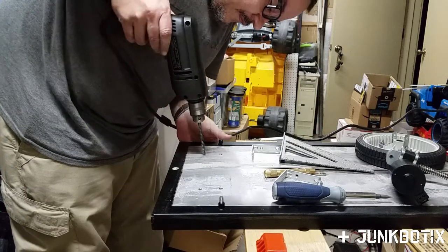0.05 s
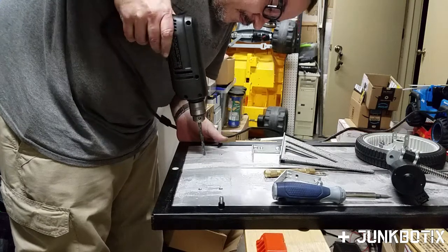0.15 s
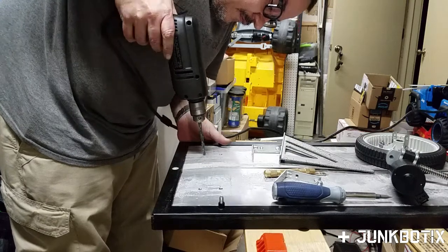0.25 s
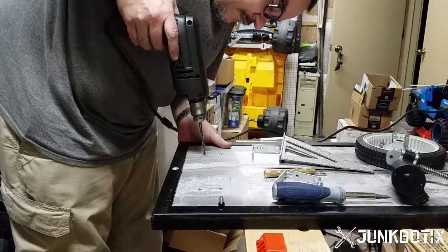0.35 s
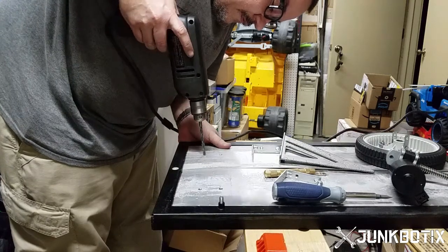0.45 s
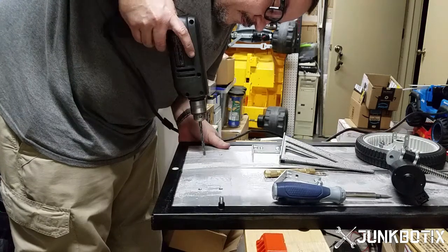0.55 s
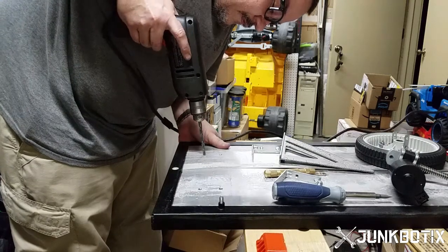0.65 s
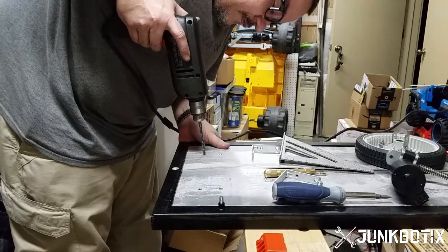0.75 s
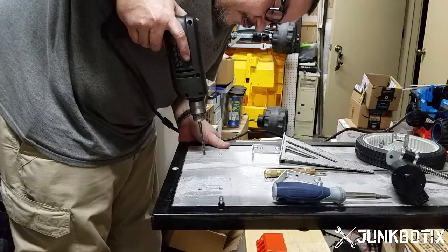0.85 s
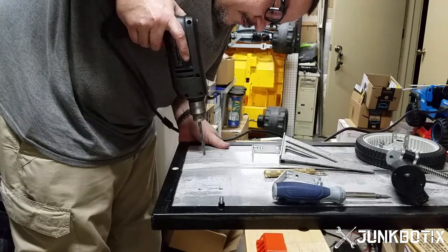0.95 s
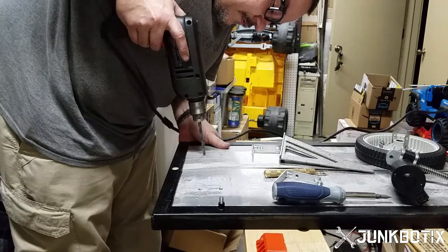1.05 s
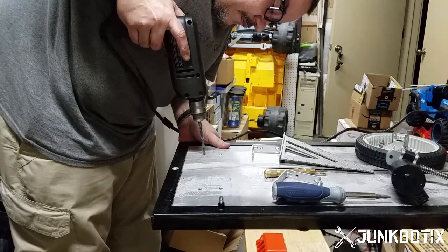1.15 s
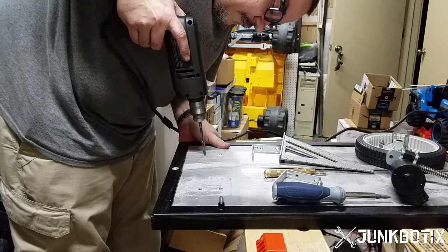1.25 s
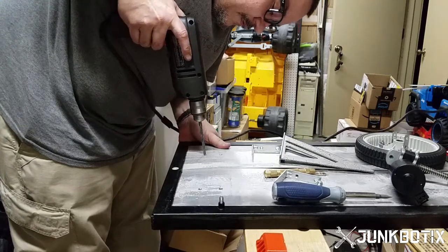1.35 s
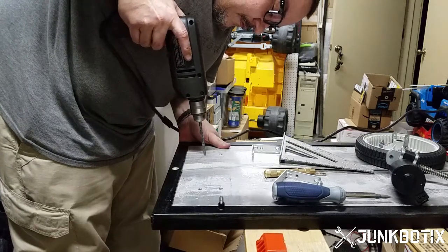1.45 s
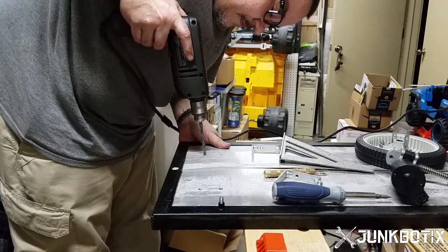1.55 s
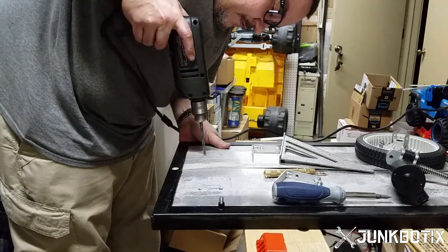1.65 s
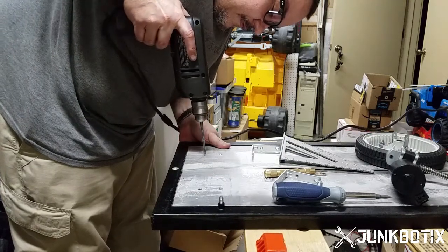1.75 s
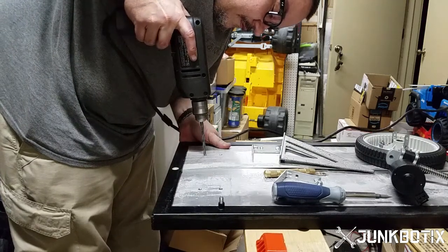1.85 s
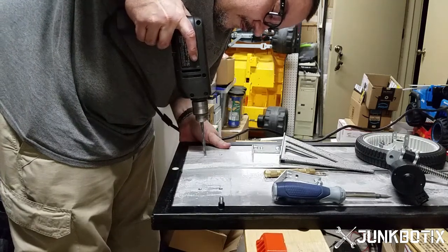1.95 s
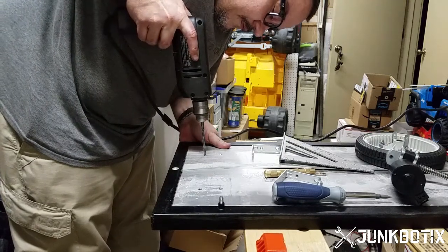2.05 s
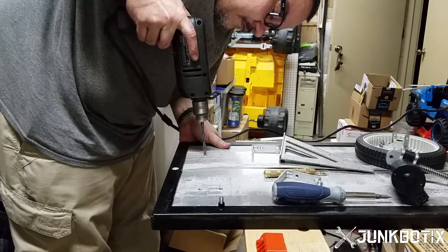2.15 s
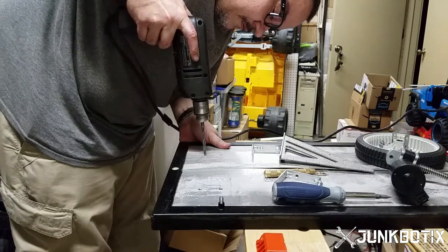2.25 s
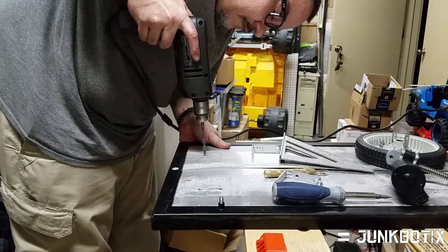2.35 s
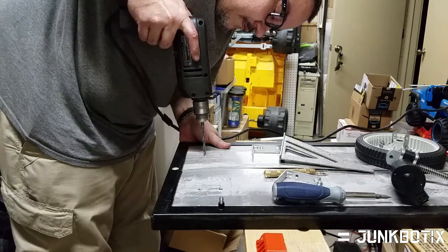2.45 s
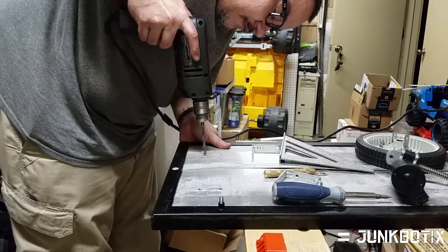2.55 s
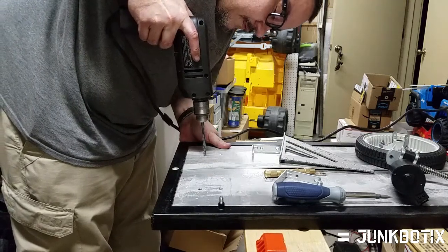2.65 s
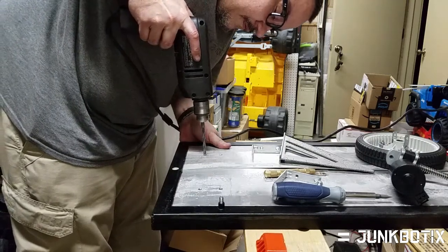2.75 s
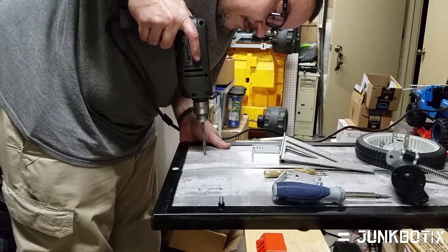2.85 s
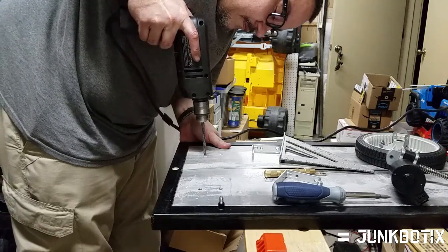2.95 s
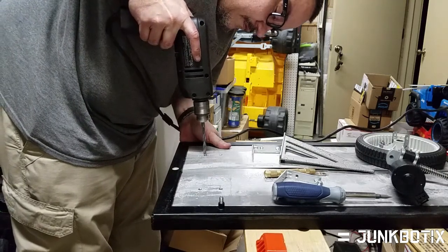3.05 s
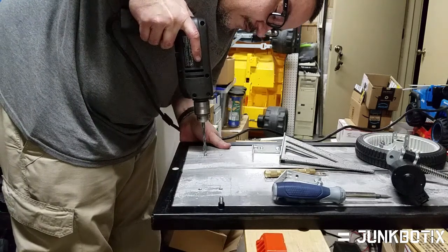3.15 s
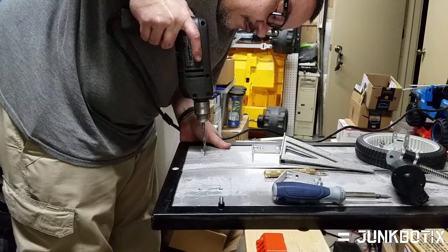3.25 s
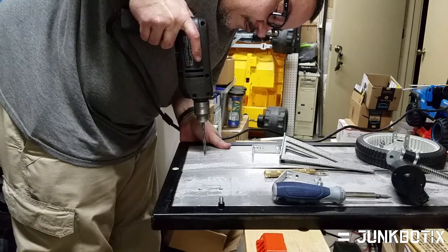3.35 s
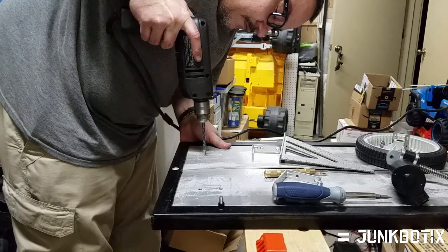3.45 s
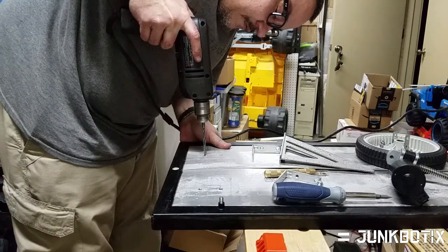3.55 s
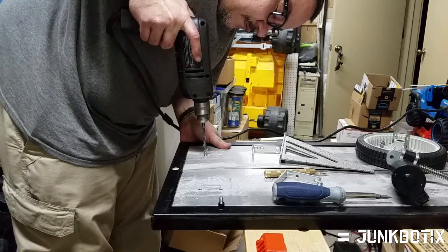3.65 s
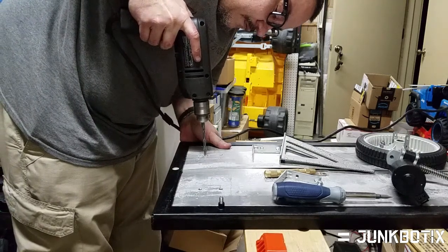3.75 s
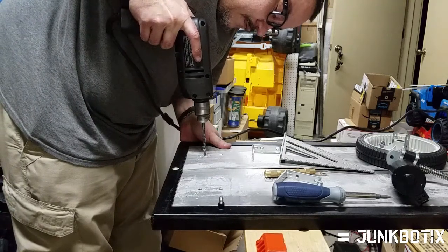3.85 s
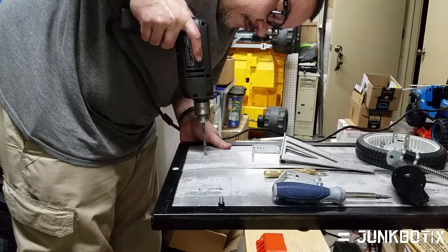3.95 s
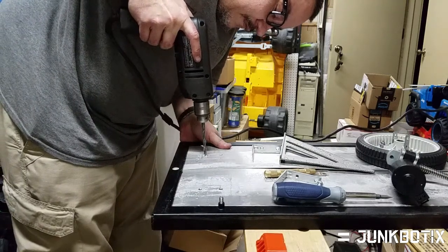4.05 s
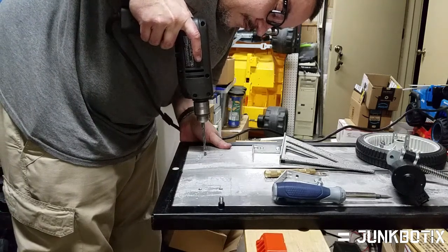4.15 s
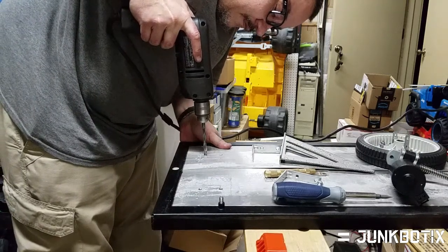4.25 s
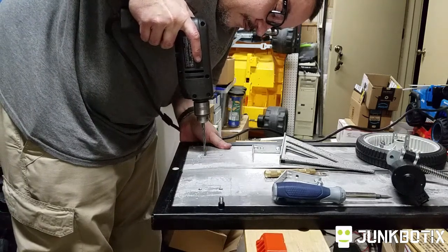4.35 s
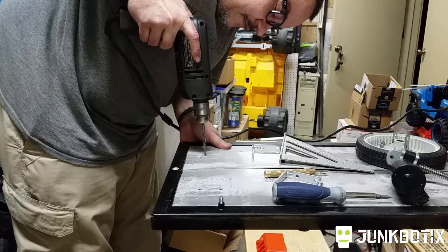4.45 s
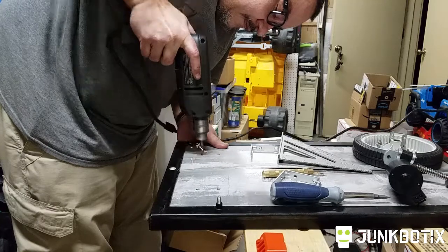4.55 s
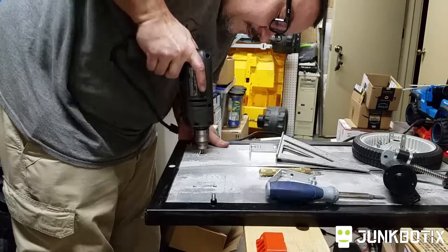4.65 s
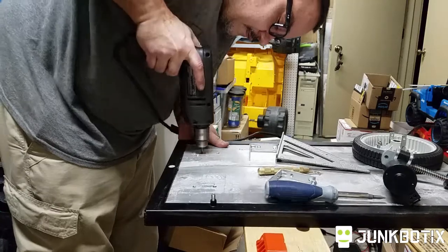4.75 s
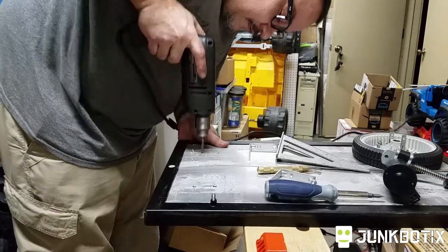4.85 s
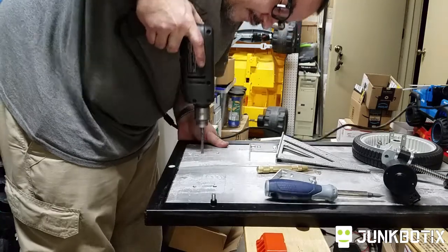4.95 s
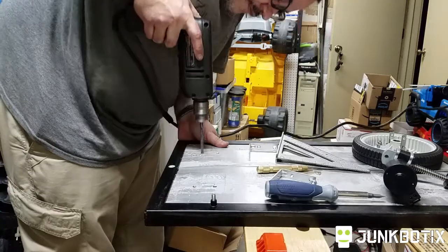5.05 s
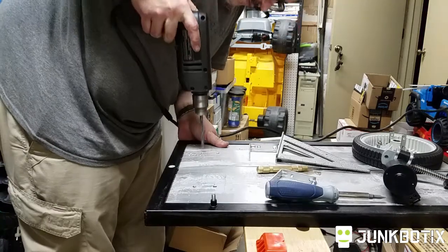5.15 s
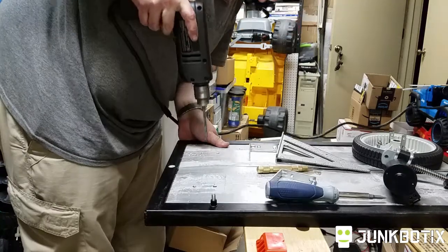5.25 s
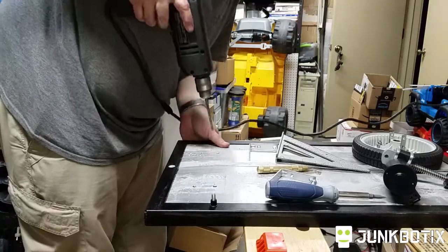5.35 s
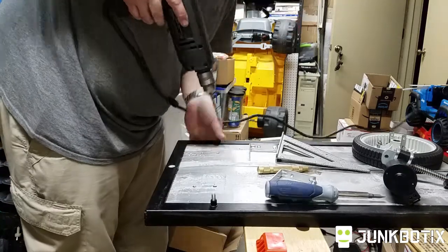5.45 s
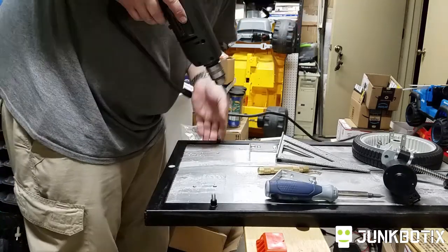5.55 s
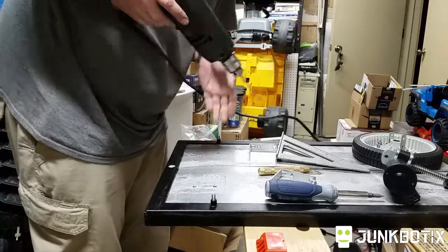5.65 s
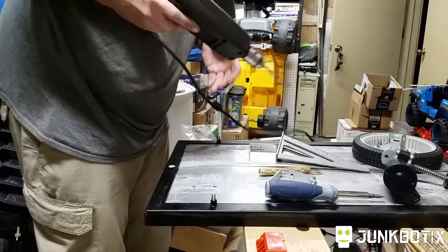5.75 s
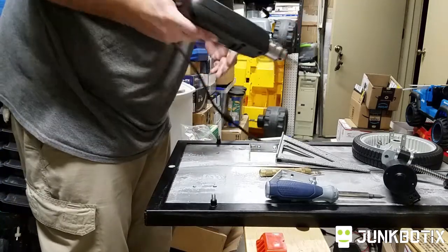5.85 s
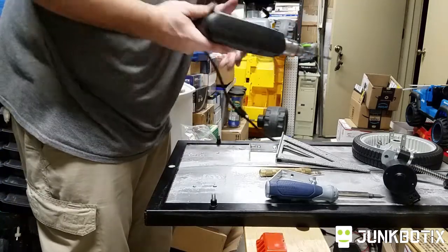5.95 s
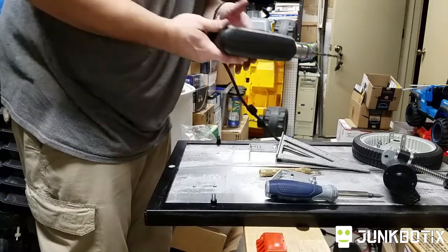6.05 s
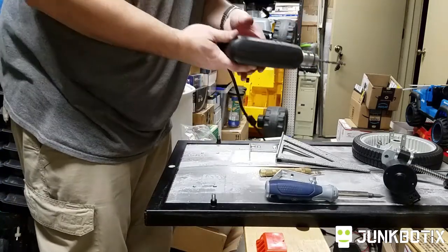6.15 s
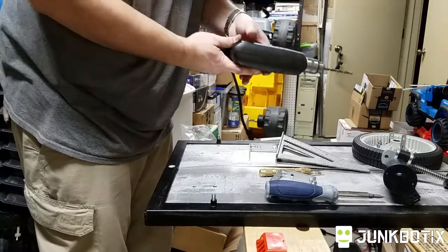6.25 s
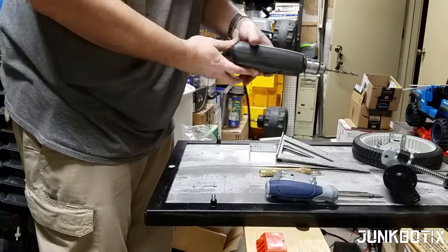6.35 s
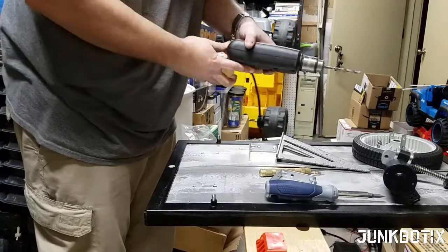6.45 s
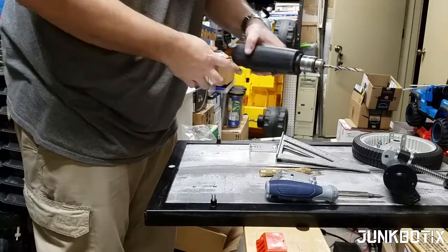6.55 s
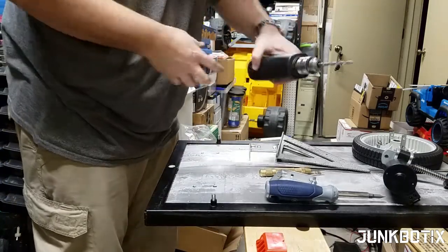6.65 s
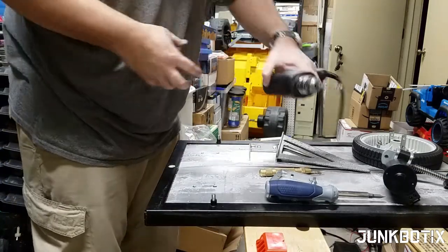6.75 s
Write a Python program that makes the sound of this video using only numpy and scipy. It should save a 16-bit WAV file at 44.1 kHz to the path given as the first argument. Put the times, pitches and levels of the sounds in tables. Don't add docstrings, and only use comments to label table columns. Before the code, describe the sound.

In a small cluttered workshop, a hand slides and taps lightly on an aluminum sheet. A corded drill spins up quickly into a high gear whine with airy motor roar. As the bit bites, pitch sinks and the tone grows rough and buzzy. It breaks through, speeds up and bangs the loose sheet, then coasts down with a falling whirr. One close microphone, short room reflections.

```python
import sys
import numpy as np
from scipy import signal
from scipy.fft import rfft, irfft
from scipy.io import wavfile
from scipy.ndimage import uniform_filter1d

SR = 44100
rng = np.random.default_rng(int(sys.argv[2]) if len(sys.argv) > 2 else 0)


def materialize(psi):
    bounded = np.clip(np.atleast_2d(psi).T, -1, 1)
    quanta = np.round(bounded * 32767).astype(np.int16)
    wavfile.write(sys.argv[1], SR, quanta)


def voltage_ratio(level):
    return 10 ** (np.asarray(level, float) / 20)


N = 299439
T = np.arange(N) / SR
TEETH = 7
CRUISE_HZ = 2000
RELEASE_S = 5.06
TOP_HZ = 15650
# from seconds, to seconds.
LOOSE_SPAN_S = (4.5, 5.15)


def unit(x):
    return x / np.sqrt(np.mean(x ** 2))


def curves(table):
    s, *columns = np.transpose(table)
    return [np.interp(T, s, c) for c in columns]


def swells(table):
    return sum(np.interp(T, [s - rise, s, s + fall], [0, db, 0]) for s, db, rise, fall in table)


def between_s(start, stop, soft=.01):
    return uniform_filter1d(1. * (T > start) * (T < stop), int(soft * SR))


def walk(rate):
    k = int(SR / rate)
    steps = np.repeat(rng.standard_normal(N // k + 1), k)
    return unit(uniform_filter1d(uniform_filter1d(steps, k), k)[:N])


def band(x, lo_hz, hi_hz):
    return signal.sosfilt(signal.butter(2, [lo_hz, hi_hz], "band", fs=SR, output="sos"), x)


def resonances(hz, rings):
    return sum(db / (1 + (2 * (hz - f) / width) ** 2) for f, width, db in rings)


def colour(x, spectrum, rings=()):
    hz = np.maximum(np.arange(N // 2 + 1) * SR / N, 1.)
    point_hz, point_db = np.transpose(spectrum)
    db = np.interp(np.log(hz), np.log(point_hz), point_db) + resonances(hz, rings)
    return unit(irfft(rfft(x) * voltage_ratio(db), N))


# start in seconds, mesh rate gained in Hz, rise in seconds.
RUN_UPS = [
    (.97, 2000, .37),
    (4.17, 850, .185),
    (4.52, 655, .2),
]
# time in seconds, mesh rate lost in Hz.
DRAG = [(1.85, 0), (2.01, 19), (2.3, 106), (2.7, 245), (3.09, 419), (3.26, 505), (3.42, 652), (3.55, 757),
        (3.85, 870), (4.1, 948), (4.17, 983), (4.65, 995), (4.72, 1120), (4.92, 983)]


def motor():
    runs = [hz * np.tanh(np.clip(T - s, 0, None) / rise) for s, hz, rise in RUN_UPS]
    drag_hz, = curves(DRAG)
    coast = np.exp(-np.clip(T - RELEASE_S, 0, None) / 1.19)
    mesh_hz = (sum(runs) - drag_hz) * coast
    spin_oct = np.log2(runs[0] / CRUISE_HZ + 1e-4)
    bite = np.tanh(drag_hz / 510)
    return mesh_hz, spin_oct, np.log2(coast), bite


# from seconds, to seconds, level in dB.
CONTACTS = [
    (.97, 4.52, 1.5),
    (4.65, 4.715, 3),
]
# peak in seconds, level in dB, rise in seconds, fall in seconds.
PUSHES = [
    (1.95, 1, .3, 0.28),
    (3.1, 2.5, 0.37, 0.37),
    (3.98, -0.5, .15, 0.14),
    (4.27, -0.5, 0.11, .14),
]


def tooth_load(spin_oct):
    loaded = sum(voltage_ratio(db) * between_s(start, stop) for start, stop, db in CONTACTS)
    return loaded * voltage_ratio(12 * spin_oct + swells(PUSHES))


# multiple of the mesh rate, level in dB idling, dB gained by biting.
LOWER = [(1, -39, -1.5), (2, -40, 10), (3, -36, 7.5)]
# multiple of the mesh rate, level in dB.
UPPER = [(4, 2.5), (5, 0), (6, -2), (7, -5.5), (8, -9), (9, -13), (10, -14), (11, -17), (12, -17),
         (13, -18), (14, -16)]
# centre in Hz, width in Hz, lift in dB.
GEAR_RINGS = [(1070, 85, 10.5), (1380, 64, 7.5), (1580, 46, 2), (1874, 260, 9.5), (2110, 200, -7),
              (2450, 340, 3), (3056, 350, 8.5), (3620, 150, 5.5), (3873, 67, 7), (4960, 480, 6),
              (5940, 180, 5)]
# frequency in Hz, level in dB.
GEAR_CASE = [(4000, -3), (5000, -2), (6000, -5), (6700, 3), (8000, -7.5), (9500, 0.5), (11000, -3),
             (12500, 9.5), (13700, 6), (14800, 14)]


def whine(mesh, mesh_hz, spin_oct, bite, unsteady, patchy):
    upper_db = -42 + 14 * bite - 7 * (T > LOOSE_SPAN_S[0]) + 40 * spin_oct
    upper_db = upper_db - 30 * np.clip(.25 - unsteady, 0, 1)
    scale = np.arange(8000.)
    rings_db = resonances(scale, GEAR_RINGS)
    case_hz, case_db = np.transpose(GEAR_CASE)
    partials = []
    for k, idle_db, bite_db in LOWER:
        ring_db = np.interp(k * mesh_hz, scale, rings_db)
        partials.append((k, idle_db + bite_db * bite + 11 * k * spin_oct + ring_db))
    for k, db in UPPER:
        partials.append((k, upper_db + db + np.interp(k * mesh_hz, case_hz, case_db)))
    out = np.zeros(N)
    for k, db in partials:
        flutter_db = 0.66 * np.roll(patchy, k * SR // 3) + (1.15 + 2.1 * unsteady) * walk(110)
        out += voltage_ratio(db + flutter_db) * np.sin(k * mesh) * (k * mesh_hz < TOP_HZ)
    return out


# multiple of the turning rate, level in dB.
UNEVEN = [(6, -12), (8, -4), (9, -12), (11, -6), (12, -33), (13, -29), (15, -9), (20, -15)]


def uneven_teeth(mesh, patchy):
    return sum(voltage_ratio(db + 1.9 * np.roll(patchy, k * SR // 4)) * np.sin(k * mesh / TEETH + k ** 2)
               for k, db in UNEVEN)


# middle in seconds, length in seconds, multiple of the turning rate, level in dB.
ROTOR_KNOCKS = [
    (2.75, 0.76, 2, -47),
    (5.167, 0.13, 3, -32),
    (5.36, 0.15, 4, -33.5),
    (5.603, 0.13, 3, -35),
    (5.844, .05, 8, -37),
    (6.34, .06, 8, -48),
    (6.527, 0.12, 10, -51),
    (6.7, 0.22, 10, -57),
]


def rotor_knocks(turn):
    return sum(voltage_ratio(db) * np.exp(-((T - s) / (length / 2)) ** 2) * np.sin(round(k) * turn)
               for s, length, k, db in ROTOR_KNOCKS)


def rotor_wobble(turn, mesh_hz, coast_oct, bite):
    steadied_db = -19 * np.clip((bite - .26) / 0.087, 0, 1)
    db = -44.5 + 18 * np.log2(mesh_hz / CRUISE_HZ + 1e-4)
    db = db + np.where(T < 4.73, steadied_db, 4.5 + 7 * coast_oct)
    return voltage_ratio(db + 1.2 * walk(14)) * np.sin(turn)


def gears(mesh_hz, turn, spin_oct, coast_oct, bite):
    unsteady = np.clip(0.094 + 0.56 * bite, 0, 1)
    contact = tooth_load(spin_oct)
    patchy = walk(5.964)
    twist = 2 * np.pi * np.cumsum(0.00905 * unsteady * mesh_hz * walk(140)) / SR
    mesh = TEETH * turn + twist + 0.78 * unsteady * walk(200)
    between = voltage_ratio(-32.0 - 27 * unsteady) * uneven_teeth(mesh, patchy)
    teeth = contact * voltage_ratio(2.0) * (whine(mesh, mesh_hz, spin_oct, bite, unsteady, patchy) + between)
    windings = contact * bite ** .5 * voltage_ratio(-58.5 + 1.5 * patchy) * np.sin(2 * np.pi * 240 * T)
    return teeth + rotor_wobble(turn, mesh_hz, coast_oct, bite) + rotor_knocks(turn) + windings


def chatter(turn, depth, spread_db, rate):
    return rng.standard_normal(N) * (1 + depth * np.cos(turn)) * voltage_ratio(spread_db * walk(rate))


# frequency in Hz, level in dB per Hz.
HOUSING = [(760, -31.5), (1300, -11.5), (1720, -12), (1910, -7), (2060, -4), (2280, -1), (3650, -6),
           (4010, -1.5), (5450, -2.5), (5940, -3.5), (10000, -8), (13000, -6), (22000, -120)]
# centre in Hz, width in Hz, lift in dB.
CASE_RINGS = [(2190, 350, 2.5), (4300, 330, 2), (6580, 620, 2.5)]
# frequency in Hz, level in dB per Hz.
HISS = [(2000, -29), (3000, 7.5), (4300, -7), (7700, 2.5), (9000, -2.5), (10200, -8.5), (11500, 2.5),
        (13500, 4), (16000, 4.5)]
# peak in seconds, level in dB, rise in seconds, fall in seconds.
AIR_SWELL = [
    (1.9, 0.5, 0.53, 0.77),
    (3.15, 4.5, 0.98, 0.3),
]
# peak in seconds, level in dB, rise in seconds, fall in seconds.
LURCHES = [(3.12, -4, .3, 0.14), (4.33, 1, .1, 0.14), (4.504, 1.5, .05, .015), (4.568, 2.5, 0.075, 0.055),
           (4.64, -3, 0.05, .01), (4.656, 4.5, .014, 0.14), (4.802, 2, .03, 0.36),
           (5.184, -4.5, 0.076, 0.077), (5.37, 2, .01, 0.051), (5.506, 3.5, 0.049, .035),
           (5.636, 5, .09, 0.25), (5.866, 5.5, 0.059, .04), (5.918, 6.5, .012, 0.24),
           (6.158, 5.5, 0.12, .02), (6.382, 5, 0.3, .05), (6.472, -1, .07, 0.037), (6.548, 6.5, 0.046, .06),
           (6.708, -8.5, 0.069, .008), (6.72, 2.5, .008, .2)]


def housing(turn, free_oct, bite, loose, lifted):
    roar_db = -20 + 8 * free_oct - 1.85 * bite - 6 * lifted + swells(LURCHES)
    air_db = -1.5 + 3.5 * free_oct - 2 * loose + swells(AIR_SWELL) + 2.8 * lifted
    roar = colour(chatter(turn, 0.21, 1.93, 400), HOUSING, CASE_RINGS) * voltage_ratio(-1.5)
    hiss = colour(chatter(turn, 0.15, 1.82, 600), HISS) * voltage_ratio(air_db)
    return voltage_ratio(roar_db) * (roar + hiss)


# frequency in Hz, level in dB per Hz.
LOOSE_SHEET = [(110, -38), (180, -16.5), (225, -14), (410, -9), (584, -16), (705, -6), (882, -10.5),
               (1030, -11.5), (1450, -9), (3000, -19.5), (3900, -28), (6600, -120)]
# centre in Hz, width in Hz, lift in dB.
SHEET_RINGS = [(258, 60, 0.5), (362, 83, 2.5), (670, 150, 2), (1039, 180, 3)]
# frequency in Hz, level in dB per Hz.
HELD_SHEET = [(110, -53), (180, -25.5), (269, -17), (307, -16.5), (483, -6), (585, -7.5), (1080, -4.5),
              (1230, -8.5), (2000, -8), (2600, -21), (4400, -120)]
# peak in seconds, level in dB, rise in seconds, fall in seconds.
BANGS = [(1.41, 2.5, 0.22, 0.96), (2.39, 1, .08, .03), (3.21, -1.5, 0.037, .08), (3.31, -4, 0.055, 0.17),
         (3.83, 2.5, 0.092, 0.054), (4.45, 4, 0.25, 0.03), (4.524, 9, 0.026, .13),
         (4.74, 2.5, 0.086, 0.025), (4.834, 9.5, 0.075, 0.016), (4.866, 8.5, .016, 0.11),
         (5.064, 2.5, .02, 0.11), (5.55, 3.5, 0.31, 0.28), (5.832, 8.5, 0.046, 0.081),
         (6.36, 0.5, .15, .08), (6.7, -6, 0.064, 0.036)]


def shuddering_sheet(knocks, speed_oct, spin_oct, coast_oct, loose):
    sheet_db = -33 + 6 * speed_oct + 4 * coast_oct + 5 * loose + swells(BANGS)
    rumble_db = -29.5 - 9.5 * np.clip(speed_oct - spin_oct, -.9, 1) + 8 * loose + 2.8 * walk(7)
    sheet = loose * colour(knocks, LOOSE_SHEET, SHEET_RINGS) + (1 - loose) * colour(knocks, HELD_SHEET)
    rumble = unit(band(band(rng.standard_normal(N), 80, 230), 80, 230)) * voltage_ratio(rumble_db)
    return voltage_ratio(sheet_db) * (sheet + rumble) * (T > RUN_UPS[0][0])


def singing(table, width_hz):
    s, length, hz, db = np.transpose(table)
    carrier = 2 * np.pi * np.cumsum(np.interp(T, s, hz)) / SR
    size = sum(np.interp(T, [a - d, a, a + d], [0, voltage_ratio(g), 0]) for a, d, g in zip(s, length, db))
    return size * (walk(width_hz) * np.cos(carrier) + walk(width_hz) * np.sin(carrier))


# peak in seconds, rise and fall in seconds, pitch in Hz, level in dB.
PANEL_SONG = [
    (1.15, 0.13, 2250, -38),
    (1.5, 0.31, 2226, -55),
    (2.1, 0.84, 2253, -31.5),
    (5.25, .2, 2175, -39.5),
    (5.5, 0.19, 2340, -44),
    (5.66, 0.21, 2280, -37),
    (5.82, 0.16, 2123, -40),
    (6.0, .13, 2337, -42),
]
# peak in seconds, rise and fall in seconds, pitch in Hz, level in dB.
VENT_SONG = [
    (1.27, .2, 4300, -29.5),
    (5.7, .08, 4300, -47),
    (5.93, .12, 4100, -41),
    (6.34, 0.19, 4495, -40.5),
    (6.56, 0.074, 4470, -41),
]


def drill():
    mesh_hz, spin_oct, coast_oct, bite = motor()
    turn = 2 * np.pi * np.cumsum(mesh_hz) / (TEETH * SR)
    speed_oct = np.log2(mesh_hz / CRUISE_HZ + 1e-4)
    loose = between_s(*LOOSE_SPAN_S)
    lifted = between_s(LOOSE_SPAN_S[1], T[-1] + 1, soft=0.14)
    knocks = chatter(turn, 0.14, 1.38, 90)
    noise = housing(turn, spin_oct + coast_oct, bite, loose, lifted)
    noise = noise + shuddering_sheet(knocks, speed_oct, spin_oct, coast_oct, loose)
    noise = noise + lifted * voltage_ratio(-50 + 6.5 * coast_oct) * unit(band(knocks, 235, 620))
    songs = singing(PANEL_SONG, 250) + singing(VENT_SONG, 1900)
    return voltage_ratio(0.38 * walk(25.16)) * noise + gears(mesh_hz, turn, spin_oct, coast_oct, bite) + songs


# start in seconds, peak in dB, pitch in Hz, relative treble in dB, width in octaves.
TAPS = [(0.152, -47.5, 1130, -21, 2.0), (0.224, -46.5, 1140, -8, 2.1), (0.322, -39.5, 1300, -10, 1.1),
        (0.405, -47, 999, -5, 2.3), (0.442, -34, 1320, -16, 1.9), (0.579, -36, 1000, -9, 2),
        (0.96, -52, 703, -24, 2.1), (0.978, -36, 930, -7, 2.9), (0.994, -39, 810, -11, 1.8),
        (1.029, -45, 703, -14, 1.9), (1.043, -39, 721, -13, 1.8), (1.077, -37, 1070, -19, 1.8),
        (0.7173, -57, 2100, -14, 0.4), (0.8979, -50, 2120, -14, 0.4), (0.799, -44, 423, -30, 0.31)]


def taps():
    length = 8192
    out = np.zeros(N + length)
    t = np.arange(length) / SR
    for s, db, hz, treble_db, octaves in TAPS:
        fade = np.exp(-np.log(1000) * t / 0.12 * (1 + (hz / 1900) ** 4))
        reach = 2 ** (max(octaves, .1) / 2)
        body = unit(band(rng.standard_normal(length), hz / reach, hz * reach)) * fade
        tick = unit(band(rng.standard_normal(length), 3000, 11000)) * fade ** 1.4 * voltage_ratio(treble_db)
        start = int(s * SR)
        out[start:start + length] += voltage_ratio(db - 8.0) * (body + tick)
    return out[:N]


# time in seconds, level in dB.
SHUFFLE = [
    (0.0, -76),
    (0.12, -66.5),
    (0.274, -77),
    (0.488, -79),
    (0.684, -75),
    (0.95, -101.5),
]
# frequency in Hz, level in dB per Hz.
SHOP = [(15, -26), (40, -5), (70, 2.5), (110, -7), (170, -11.5), (260, -8), (500, -10.5), (1000, -11.5),
        (1900, -17.5), (4400, -27), (7000, -37), (15500, -36)]


def shop():
    hum = colour(rng.standard_normal(N), SHOP) * voltage_ratio(-63.5 + 0.13 * walk(2.7))
    rustle = unit(band(chatter(0, 0, 3.3, 73), 2000, 15000)) * voltage_ratio(curves(SHUFFLE)[0]) * (T < 1)
    return hum + rustle


def room(near):
    t = np.arange(SR // 2) / SR
    tail = rng.standard_normal(len(t)) * np.exp(-np.log(1000) * t / 0.33) * (t > .004)
    return voltage_ratio(-5.5) * signal.fftconvolve(near, tail / np.sqrt(np.sum(tail ** 2)))[:N]


def scene():
    near = drill() + taps()
    heard = near + room(near)
    return np.tile(heard * voltage_ratio(-1.44) + shop(), (2, 1))


# middle in seconds, level in dB re the sound.
SPLITS = [(2.38, -9), (2.475, -15), (2.52, -13), (2.66, -10), (2.845, -6), (3.22, -10), (3.80, -9),
          (5.47, -10)]


def parted_treble(sound):
    blink = sum(voltage_ratio(db) * np.cos(np.pi * np.clip((T - s) / .046, -.5, .5)) for s, db in SPLITS)
    side = blink * np.roll(band(band(sound, 4700, 16000), 4700, 16000), SR // 20)
    return np.array([side, -side])


def top_cut(x):
    return signal.sosfilt(signal.butter(12, 16570, fs=SR, output="sos"), x)


def record(dry):
    low_pass = signal.ellip(10, .2, 80, TOP_HZ, fs=SR, output="sos")
    mix = signal.sosfilt(low_pass, dry + parted_treble(dry[0]))
    return top_cut(mix)


dry = scene()
out = record(dry)
materialize(out)
```